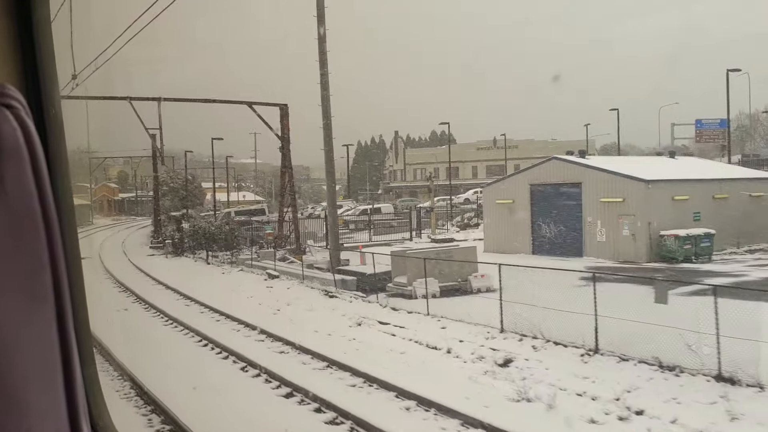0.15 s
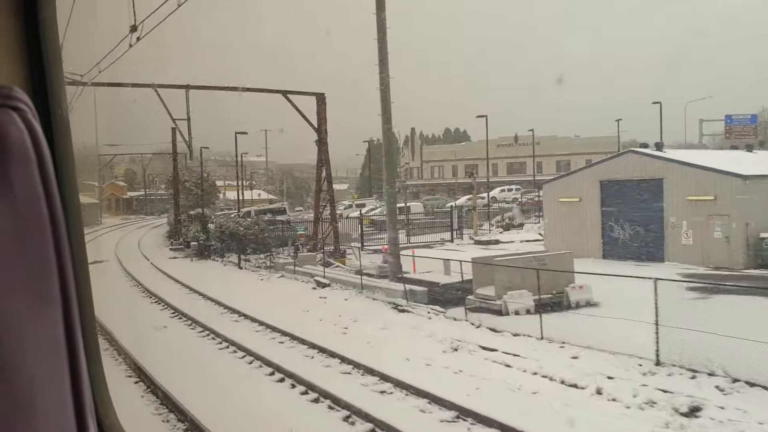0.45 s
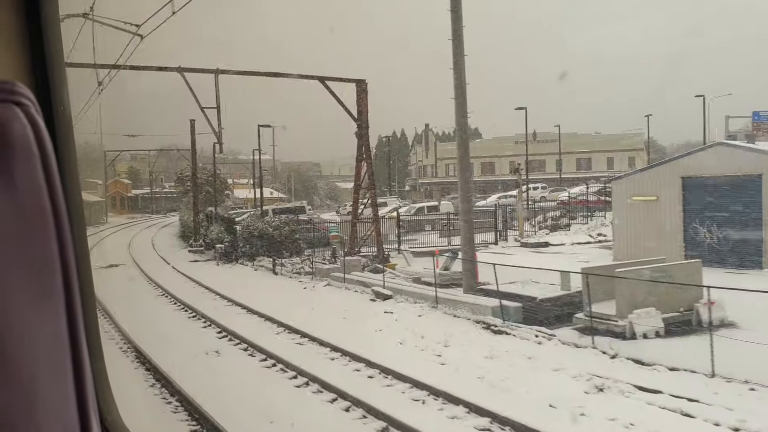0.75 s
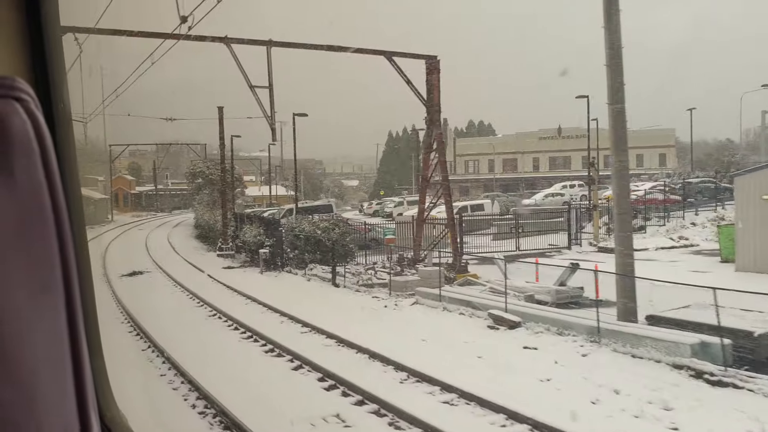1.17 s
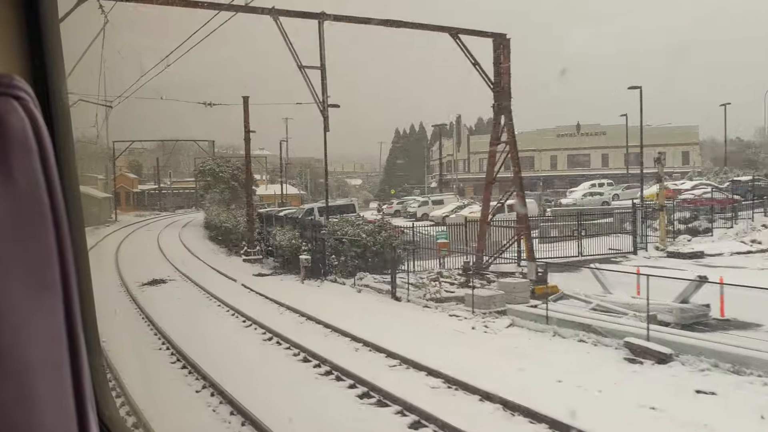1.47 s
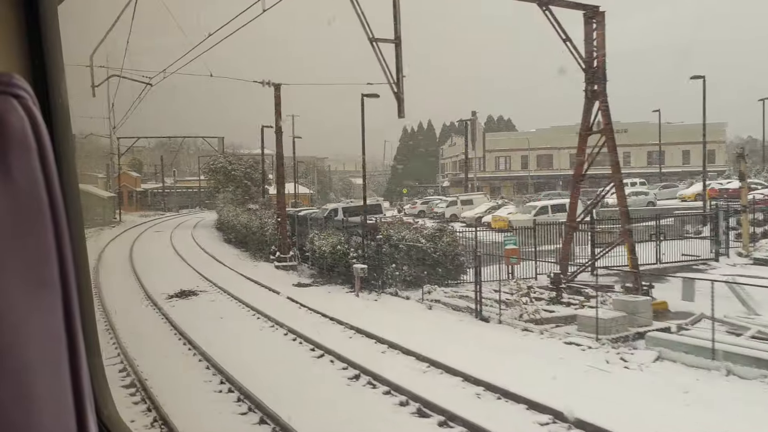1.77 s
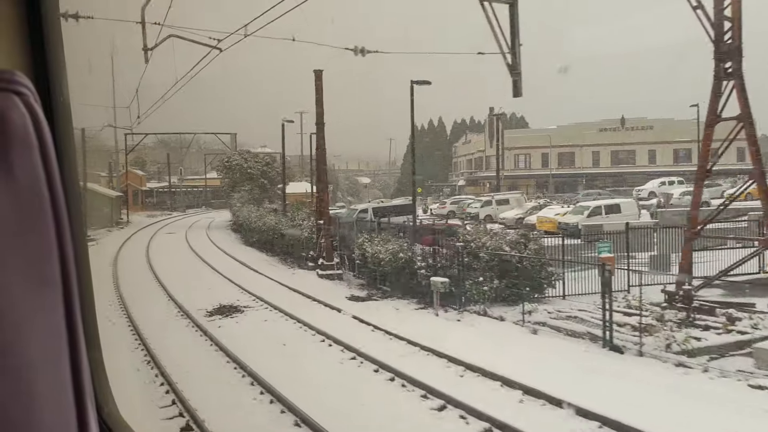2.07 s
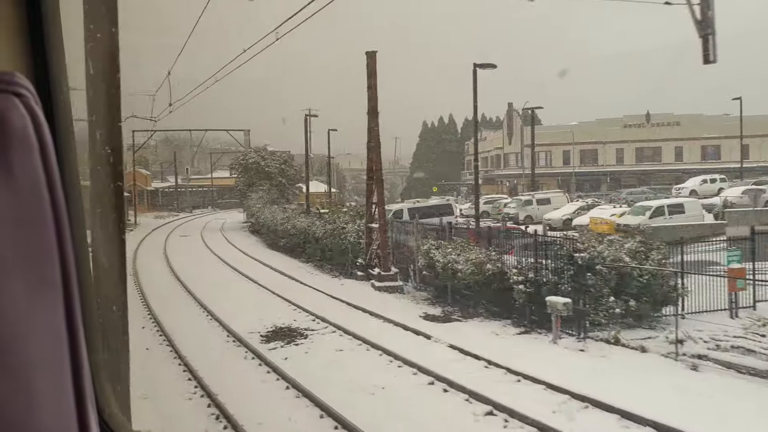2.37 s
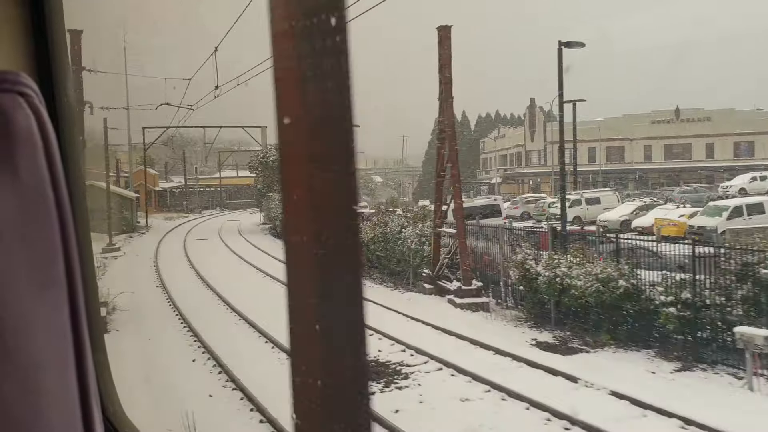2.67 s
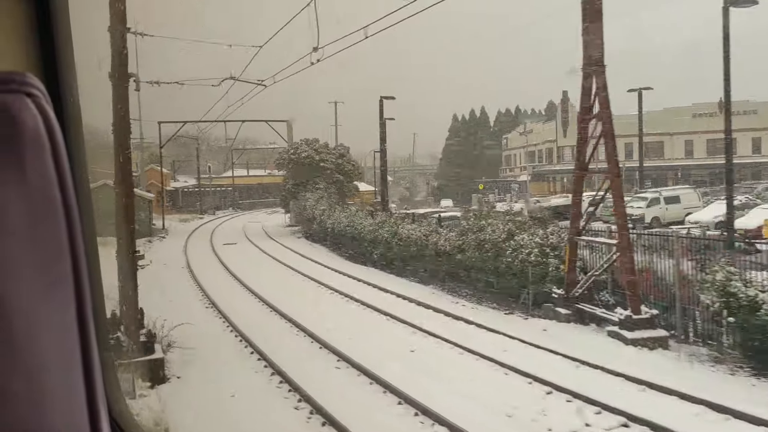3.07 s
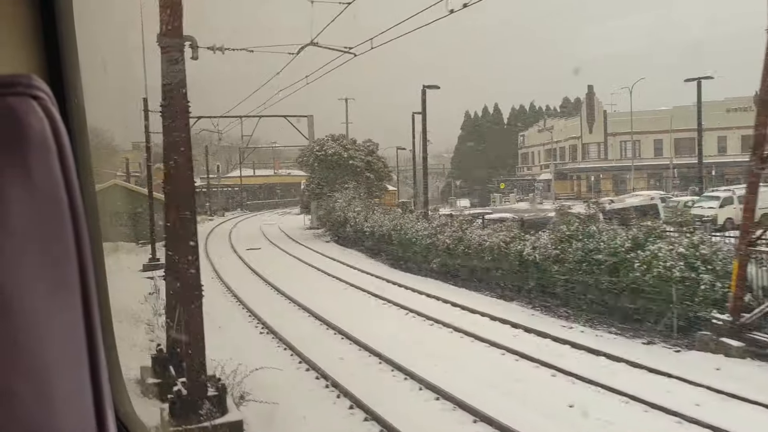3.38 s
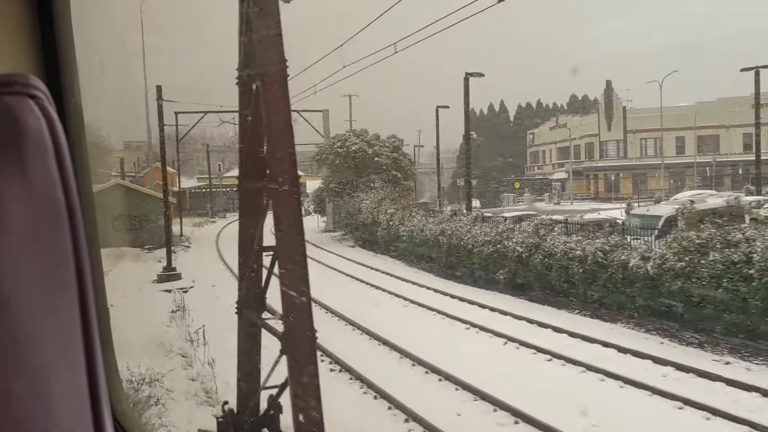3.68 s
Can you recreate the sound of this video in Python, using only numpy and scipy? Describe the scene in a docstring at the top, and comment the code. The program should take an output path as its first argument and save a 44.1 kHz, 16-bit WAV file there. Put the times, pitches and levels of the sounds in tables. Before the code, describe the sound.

A train rumbles along the tracks for the whole four seconds, heard from inside the carriage. The deep boom wavers slightly, with small swells near 0.4 and 1.5 seconds, over a steady dull roar of wheels. Ventilation hisses evenly throughout, and a very faint high hiss swells and fades. At about 3.5 seconds a hand knocks the phone once, softly.

```python
"""Inside a rolling railway carriage.

Rough rail shakes the floor and the air into a deep and an upper boom, over the dull roar of the wheels.
The air rings across the carriage, the ventilation hisses steadily and a faint treble swells and fades.
A phone with two microphones hears it all; near the end a hand knocks it once, softly."""
import sys
import numpy as np
from scipy import signal
from scipy.fft import rfft, irfft, next_fast_len
from scipy.io import wavfile
from scipy.ndimage import uniform_filter1d

SR = 44100
rng = np.random.default_rng(int(sys.argv[2]) if len(sys.argv) > 2 else 0)


def dump(signal):
    """Clip the signal to [-1, 1] and save it as 16-bit WAV at the path in sys.argv[1]."""
    limited = np.clip(np.atleast_2d(signal).T, -1, 1)
    pcm = np.round(limited * 32767).astype(np.int16)
    wavfile.write(sys.argv[1], SR, pcm)


N = 168903


def undb(db):
    return 10 ** (np.asarray(db) / 20)


def over_hz(table, hz, **ends):
    """Read a (Hz, value) table on a log-frequency axis."""
    table = np.array(table)
    return np.interp(np.log(hz), np.log(table[:, 0]), table[:, 1], **ends)


def gain_curve(table, column=1):
    """Gain per sample from a table of seconds and levels in dB."""
    table = np.array(table)
    return undb(np.interp(np.arange(N) / SR, table[:, 0], table[:, column]))


def wander(rate_hz):
    """Random steps, smoothed twice; mean 0, spread 1."""
    hold = int(SR / rate_hz)
    steps = np.repeat(rng.standard_normal(N // hold + 1), hold)
    smooth = uniform_filter1d(uniform_filter1d(steps, hold), hold)[:N]
    return (smooth - smooth.mean()) / smooth.std()


def unit_mid(pair):
    """Scale a stereo pair so that its mid has rms 1."""
    return pair / np.sqrt(np.mean(pair.mean(axis=0) ** 2))


def steadied(pair, window_s, share):
    """Take out a share of the slow chance swings of a noise."""
    envelope = np.sqrt(uniform_filter1d(pair.mean(axis=0) ** 2, int(window_s * SR)) + 1e-9)
    return unit_mid(pair / envelope ** share)


# Microphone balance. Each row: frequency in Hz, left minus right in dB.
MIC_BALANCE = [(100, -0.3), (250, -1.5), (400, 2.3), (700, -4.5), (1000, -2), (1300, -2.3), (2000, -1.5),
               (3100, -2.6), (4200, 5.5), (5500, 3.5), (6700, 10.5), (7800, 2), (10500, 3), (12500, -1.5),
               (15500, -4)]
# Sound that differs between the microphones. Each row: frequency in Hz, share in dB (capped at 0).
MIC_INCOHERENCE = [(40, -23), (64, -24), (104, -25), (130, -25), (170, -25), (250, -7), (285, -5),
                   (318, -4), (345, -8), (390, -11), (600, -10.5), (800, -1.5), (1080, -1.5), (1300, -2.1),
                   (1600, -1), (1800, -2), (2500, -0.7), (3300, 0), (5000, -.6), (16000, 4)]


def diffuse(spectrum, left_lead_s=6e-5, bands=1, flicker_db=0., flicker_hz=8.):
    """Noise from all sides at two microphones; each band can flicker on its own."""
    size = next_fast_len(N)
    hz = np.maximum(np.arange(size // 2 + 1) * SR / size, 1)
    coherence = 1 - np.clip(undb(2 * over_hz(MIC_INCOHERENCE, hz)), 0, 1)
    mid, side = rfft(rng.standard_normal((2, size)))
    mid *= np.sqrt(1 + coherence)
    side *= np.sqrt(1 - coherence)
    tilt = undb(over_hz(MIC_BALANCE, hz) / 2)
    lead_rad = 2 * np.pi * hz * left_lead_s
    pair = np.array([(mid + side) * tilt * np.exp(1j * lead_rad), (mid - side) / tilt])
    pair /= np.sqrt(tilt ** 2 + tilt ** -2 + 2 * coherence * np.cos(lead_rad))  # keeps the mid flat
    pair *= undb(over_hz(spectrum, hz, left=-200, right=-200))
    low_hz, high_hz = spectrum[0][0], spectrum[-1][0]
    band_index = np.floor(np.log(hz / low_hz) / np.log(high_hz / low_hz) * bands)
    noise = np.zeros((2, N))
    for k in range(bands):
        band = irfft(pair * (band_index == k), size)[:, :N]
        noise += band * undb(flicker_db * wander(flicker_hz))
    return unit_mid(noise)


# Treble hiss, low and top part. Each row: frequency in Hz, relative density in dB.
TREBLE_LOW_SPECTRUM = [(4820, -31), (8200, -4), (8900, 1.5), (11100, 4), (12200, -2.5), (15900, -34),
                       (22000, -120)]
TREBLE_TOP_SPECTRUM = [(6940, -26), (11800, -2), (13600, -3), (15100, -2), (15600, -8)]
# Each row: time in seconds, low level in dB, top level in dB.
TREBLE_LEVELS = [(0.0, -69, -72), (0.01, -69, -77), (0.11, -68, -76), (0.17, -70, -80), (0.87, -68.5, -78),
                 (0.9, -67, -77), (0.95, -72, -79), (1.04, -66.5, -79), (1.12, -66.5, -71),
                 (1.31, -66.5, -68), (1.39, -69, -76), (1.59, -66, -72), (1.72, -69.5, -82),
                 (1.77, -68, -75), (2.16, -68, -71), (2.36, -65, -70), (2.44, -67.5, -74), (3.0, -63, -70),
                 (3.19, -66.5, -67), (3.34, -68, -72), (3.42, -67, -68), (3.49, -68.5, -75),
                 (3.79, -69, -77), (3.83, -68, -74)]


def treble_hiss():
    """A thin, high hiss that swells and fades."""
    low = diffuse(TREBLE_LOW_SPECTRUM, bands=2, flicker_db=0.8, flicker_hz=14)
    top = diffuse(TREBLE_TOP_SPECTRUM, bands=2, flicker_db=0.5, flicker_hz=20)
    return low * gain_curve(TREBLE_LEVELS, column=1) + top * gain_curve(TREBLE_LEVELS, column=2)


# Grille hiss, low and top part. Each row: frequency in Hz, relative density in dB.
VENT_LOW_SPECTRUM = [(620, -42), (1050, -3.5), (1520, -4), (1910, 1), (2220, -1.5), (2540, 0), (3350, -5.5),
                     (4200, -9), (5460, -19), (9240, -120)]
VENT_TOP_SPECTRUM = [(2290, -31), (3900, -3.5), (4900, -2), (6640, 1.5), (8600, -18), (11200, -47),
                     (18900, -120)]
# Each row: time in seconds, low level in dB, top level in dB.
VENT_LEVELS = [(0.0, -48.5, -54.5), (0.72, -49, -53), (0.85, -48, -54.5), (1.1, -49, -53), (2.15, -49, -54),
               (2.38, -47.5, -52.5), (2.39, -48.5, -54), (3.2, -48, -52), (3.27, -48, -54),
               (3.62, -49, -54), (3.76, -47.5, -52.5), (3.83, -49.5, -54)]


def ventilation():
    """Air rushes through grilles on the left and reaches that microphone first."""
    left_lead_s = 0.00037
    low = diffuse(VENT_LOW_SPECTRUM, left_lead_s, bands=4, flicker_db=0.06, flicker_hz=14)
    top = diffuse(VENT_TOP_SPECTRUM, left_lead_s, bands=2, flicker_db=0.72, flicker_hz=19)
    return low * gain_curve(VENT_LEVELS, column=1) + top * gain_curve(VENT_LEVELS, column=2)


# Crosswise air resonance. Each row: frequency in Hz, relative density in dB.
AIR_RING_SPECTRUM = [(60, -25), (70, -11), (76, -6), (83, -7), (92, 3), (99, -9), (110, -25)]
# Each row: time in seconds, level in dB.
AIR_RING_LEVELS = [(0.05, -54), (.9, -51), (1.9, -52), (2.15, -59), (2.8, -51), (3.3, -61), (3.8, -57)]


def air_ring():
    """The air rings across the width of the carriage, opposite at the two microphones."""
    ring = steadied(diffuse(AIR_RING_SPECTRUM), window_s=0.16, share=0.5).mean(axis=0)
    ring *= gain_curve(AIR_RING_LEVELS)
    return np.array([ring, -ring])


def hand_knock(start_s=3.4603, level_db=-32.5, ring_hz=75, t60_s=0.11):
    """A soft knock on one end of the phone: a tick sinks into a low ring, opposite at the microphones."""
    tick_cycles, tick_s = 0.5, 0.001
    fade_start_s, fade_s = 0.021, 0.006
    age_s = np.maximum(np.arange(N) / SR - start_s, 0)
    cycles = ring_hz * age_s + tick_cycles * (1 - np.exp(-age_s / tick_s))
    decay = undb(level_db - 60 * age_s / t60_s)
    fade = np.clip(1 - (age_s - fade_start_s) / fade_s, 0, 1)
    knock = np.sin(2 * np.pi * cycles) * decay * fade
    return np.array([knock, -knock])


# Rolling noise. Each row: frequency in Hz, relative density in dB.
ROAR_SPECTRUM = [(100, -15), (150, -9), (168, -0.2), (200, -0.5), (235, -4.5), (252, -2), (285, -11.5),
                 (345, -8.5), (385, -7), (420, -10), (520, -13.5), (595, -12), (680, -16.5), (750, -17),
                 (825, -18), (850, -22), (950, -23.5), (1150, -35.5), (1500, -33)]


def wheel_roar(level_db=-39):
    """Wheels rolling, dulled by the floor."""
    roar = diffuse(ROAR_SPECTRUM, bands=5, flicker_db=0.3, flicker_hz=5.52)
    return steadied(roar, window_s=0.033, share=0.25) * undb(level_db)


# Resonances of the car body. Each row: frequency in Hz, relative density in dB.
DEEP_BOOM_SPECTRUM = [(12, -34), (22, -14), (30, -13), (40, -2), (50, -2.8), (62, 1.8), (72, -3), (90, -4),
                      (106, -4.5), (125, -17.5), (170, -45)]
UPPER_BOOM_SPECTRUM = [(80, -30), (104, -5), (116, -0.5), (128, .3), (140, -0.5), (152, -6.5), (166, -13.5),
                       (200, -57)]
# Each row: time in seconds, deep level in dB, upper level in dB.
BOOM_LEVELS = [(0.0, -33.5, -39), (0.05, -33, -26.5), (0.08, -35, -36), (0.36, -32.5, -35),
               (0.39, -22.5, -30.5), (0.45, -39, -34.5), (0.47, -31.5, -35.5), (0.97, -35, -35),
               (0.99, -23.5, -41), (1.01, -32, -36.5), (1.5, -29, -33), (1.55, -47, -31.5),
               (1.65, -30, -32), (1.68, -42, -34), (1.72, -34.5, -38), (2.06, -34.5, -34.5),
               (2.21, -30.5, -38), (2.24, -35.5, -39), (2.99, -35, -30), (3.11, -34.5, -35.5),
               (3.32, -30.5, -29.5), (3.36, -37, -36.5), (3.41, -29.5, -37), (3.5, -35, -38.5),
               (3.81, -34.5, -39.5), (3.83, -31, -43)]


def body_booms():
    """Rail roughness drives the floor and the air of the carriage at their lowest resonances."""
    deep = steadied(diffuse(DEEP_BOOM_SPECTRUM), window_s=0.13, share=0.67)
    upper = steadied(diffuse(UPPER_BOOM_SPECTRUM), window_s=0.11, share=0.78)
    return deep * gain_curve(BOOM_LEVELS, column=1) + upper * gain_curve(BOOM_LEVELS, column=2)


def scene():
    return body_booms() + air_ring() + wheel_roar() + ventilation() + treble_hiss() + hand_knock()


def record(dry):
    """The phone cuts the top with a steep low-pass."""
    cutoff_hz = 15770
    return signal.sosfilt(signal.ellip(16, 0.2, 80, cutoff_hz, fs=SR, output="sos"), dry)


dry = scene()
out = record(dry)
dump(out)
```